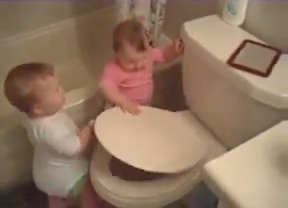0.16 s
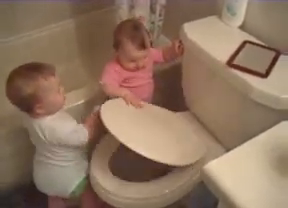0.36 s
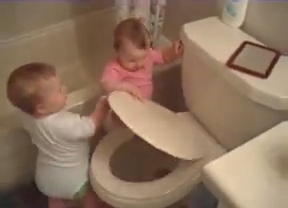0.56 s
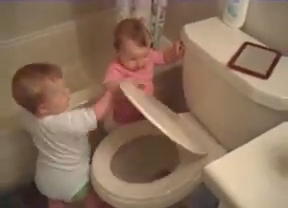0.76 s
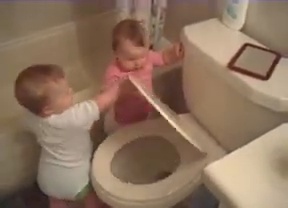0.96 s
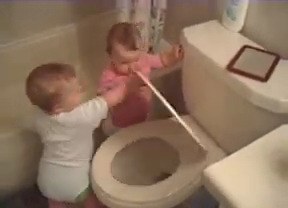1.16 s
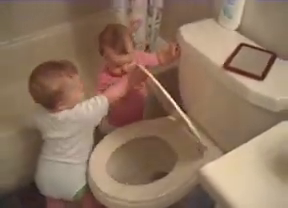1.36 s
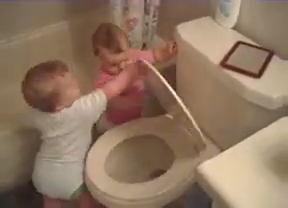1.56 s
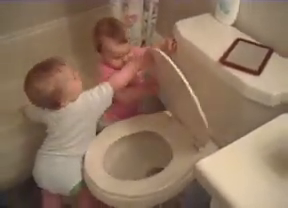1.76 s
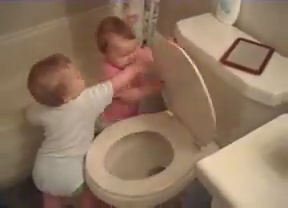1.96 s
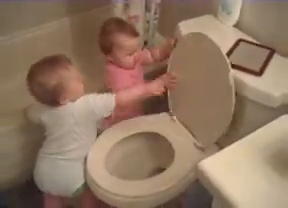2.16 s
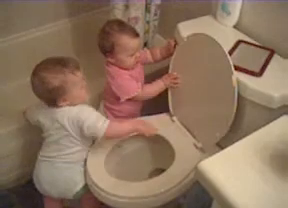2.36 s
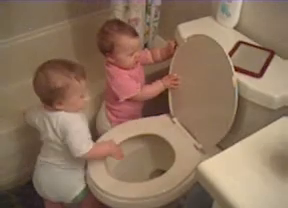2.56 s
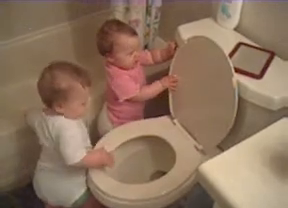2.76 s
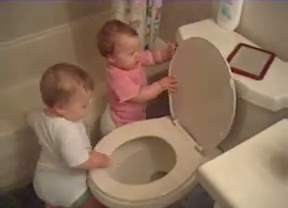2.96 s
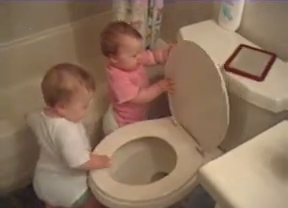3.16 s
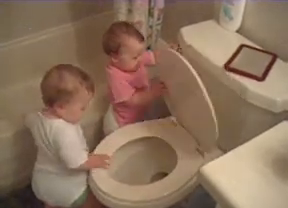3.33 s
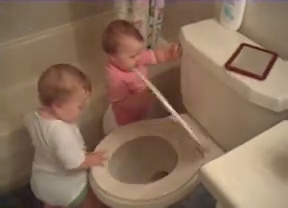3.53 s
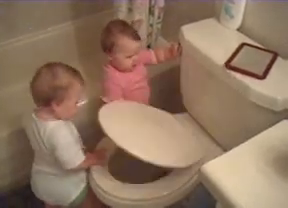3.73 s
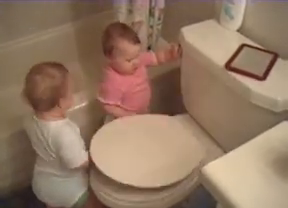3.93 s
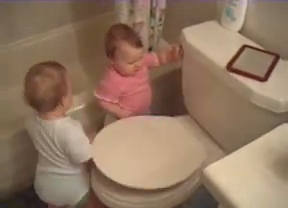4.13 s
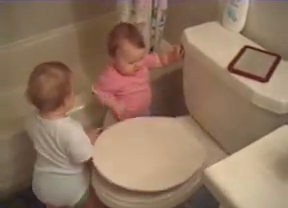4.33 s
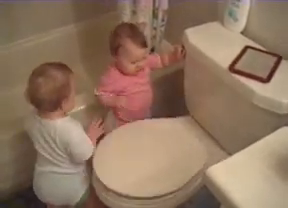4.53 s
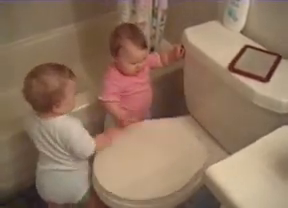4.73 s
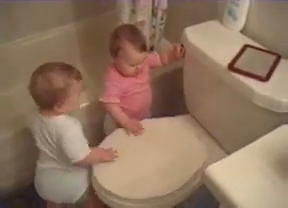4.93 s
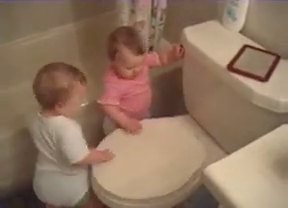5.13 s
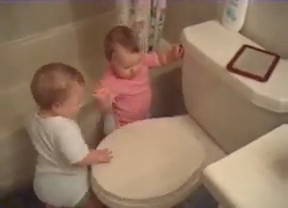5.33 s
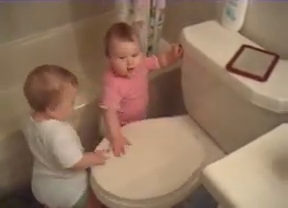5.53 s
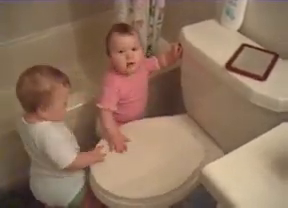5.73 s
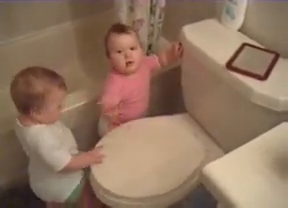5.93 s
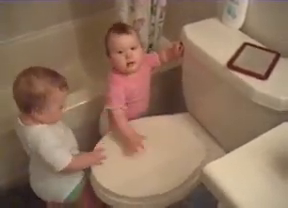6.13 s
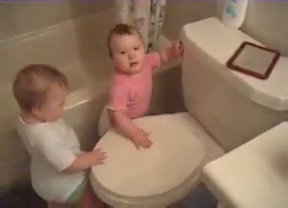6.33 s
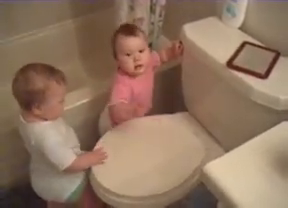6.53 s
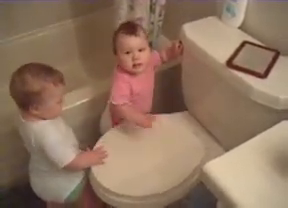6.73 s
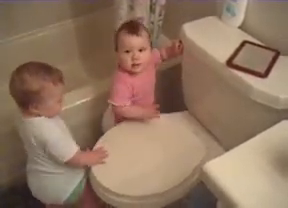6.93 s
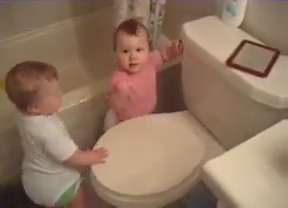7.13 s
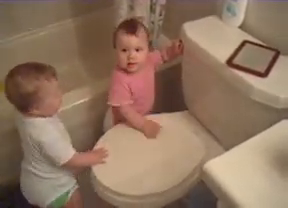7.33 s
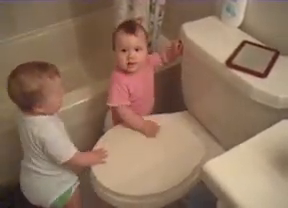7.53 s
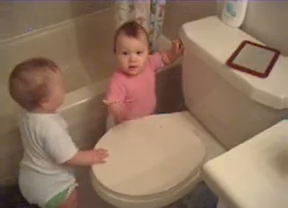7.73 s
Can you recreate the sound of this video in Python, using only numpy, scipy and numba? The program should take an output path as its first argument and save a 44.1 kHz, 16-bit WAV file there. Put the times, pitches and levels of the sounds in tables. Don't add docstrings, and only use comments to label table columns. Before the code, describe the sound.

Irregular hard bangs of a toilet lid, with hollow porcelain ringing and short bright tile echo, captured by a cheap overloaded camcorder microphone with hiss and hum.

```python
import sys
import numpy as np
from scipy import signal
from scipy.io import wavfile
from scipy.ndimage import uniform_filter1d
from numba import njit

SR = 44100
rng = np.random.default_rng(int(sys.argv[2]) if len(sys.argv) > 2 else 0)


def wav_record(signal):
    frames = np.transpose(np.atleast_2d(signal))
    bounded = np.clip(frames, -1, 1)
    quanta = np.round(bounded * 32767).astype(np.int16)
    wavfile.write(sys.argv[1], SR, quanta)


def elevation(decibels):
    levels = np.asarray(decibels, float)
    return 10 ** (levels / 20)


N = 343274
CONTACT_MS = 4.14

# start_s, end_s
STALLS = [
    (1.6387, 1.7405),
    (6.443, 6.5458),
]


def room_time(s):
    return s - sum((end - start) * (s > start) for start, end in STALLS)


def add(out, s, x):
    i = int(s * SR)
    out[i:i + len(x)] += x[:N - i]


def on_log_axis(hz, table):
    table = np.array(table)
    return np.interp(np.log(hz), np.log(table[:, 0]), table[:, 1])


def mode(t, hz, db, t60):
    return elevation(db) * np.sin(2 * np.pi * hz * t) * np.exp(-np.log(1000) * t / t60)


def blow_db(blow, hz):
    _, peak, bass, treble, _ = blow
    overdrive_db = 4
    colour = [(70, bass - 9), (250, bass), (800, bass / 2 - 3), (1500, 0), (4000, treble)]
    return peak + overdrive_db + on_log_axis(hz, colour)


def rings(blows, modes):
    ring_db, crack_db, crack_fall_s = -2.5, -1, 0.0039
    crack_len = 400
    out, t = np.zeros(N), np.arange(SR // 2) / SR
    chance = rng.standard_normal((len(blows), 2 * len(modes) + crack_len))
    contact = 1 - np.exp(-t / (CONTACT_MS * 0.00027))
    crack_shape = contact[:crack_len] * np.exp(-t[:crack_len] / crack_fall_s)
    for blow, luck in zip(blows, chance):
        ring = 0
        for k, (hz, db, t60) in enumerate(modes):
            detuned_hz = hz * (1 + 0.012 * luck[2 * k + 1])
            ring = ring + mode(t, detuned_hz, db + blow_db(blow, hz) + 2.5 * luck[2 * k], t60)
        start = room_time(blow[0])
        add(out, start, elevation(ring_db) * ring * contact)
        add(out, start, elevation(crack_db + blow_db(blow, 5000)) * luck[-crack_len:] * crack_shape)
    return out


# start_s, peak_db, bass_db and treble_db (against the middle), decay_stretch (times)
SEAT = [(3.909, -6.5, -12.5, -6.5, 1), (3.948, -17, -6.5, 2, 1), (3.998, -8, -9, -3.5, 1),
        (4.051, -13, -8, -1.5, 1), (4.09, -11.5, -10, -1.5, 0.8), (4.82, -11.5, -1, -2, .88),
        (5.441, -28, 11, -3.5, 1), (5.472, -18.5, -8.5, -3.5, .78), (6.063, -30.5, 7, -14.5, 0.94),
        (6.66, -16.5, -1.5, -9.5, 0.83), (6.698, -5.5, -7.5, -2.5, 0.72), (6.715, -9, 4, -10.5, 0.32),
        (7.373, -20, 1, -9, 1), (7.402, -20.5, -5, -0.5, 0.66)]
# pitch_hz, level_db, t60_s
SEAT_MODES = [(135, -18.5, 0.27), (396, 3.5, 0.04), (500, -6, 0.094), (737.5, -6.5, 0.15),
              (1200, -6.5, 0.049), (1602, -14, 0.038), (1995, -10.5, 0.088), (2235, -14, 0.066),
              (2800, -10.5, 0.13)]


def lid_on_seat():
    return rings(SEAT, SEAT_MODES)


# start_s, peak_db, bass_db and treble_db (against the middle), decay_stretch (times)
TANK = [
    (1.474, -12, -5.5, -6, 1.5),
    (1.529, -20.5, -6, -2, 0.72),
    (1.544, -19, -2.5, -7.5, 0.73),
    (1.564, -17.5, -6, -6.5, 0.66),
    (3.28, -17, -14.5, -6, 0.81),
]
# pitch_hz, level_db, t60_s
TANK_MODES = [(383, 1, 0.018), (656, -2.5, 0.13), (900, -5, 0.054), (1250, -13.5, 0.13),
              (1500, -10.5, 0.035), (1840, -18.5, 0.1), (2043, -10.5, 0.044)]


def lid_on_tank():
    return rings(TANK, TANK_MODES)


# start_s, level_db, centre_hz, length_ms
CRACKS = [
    (1.4766, -7.5, 2690, 2.5),
    (3.9083, -2, 2570, 0.97),
    (3.9976, -2, 1280, 2.5),
    (4.0014, -5, 2860, 1.5),
    (4.052, -7, 1500, 2.2),
    (4.0898, -3, 1002, 1.4),
    (4.8217, -5.5, 1200, 1.2),
    (6.6974, -6.5, 2140, 2),
]


def edge_cracks():
    out, t = np.zeros(N), np.arange(600) / SR
    noises = rng.standard_normal((len(CRACKS), 600))
    for (s, db, hz, ms), noise in zip(CRACKS, noises):
        burst = signal.lfilter(*signal.iirpeak(hz, 1.2, SR), noise)
        add(out, room_time(s), elevation(db) * burst / burst.std() * np.exp(-(t * 1000 / ms) ** 2))
    return out


def porcelain(knocks, modes):
    out, t = np.zeros(N), np.arange(SR) / SR
    for s, blow, hardness, front in knocks:
        ring = 0
        for hz, t60, swell_ms, db, answer in modes:
            level = blow + db + hardness * np.log2(hz / 400) + front * answer
            ring = ring + mode(t, hz, level, t60) * (1 - np.exp(-t * 1000 / swell_ms))
        add(out, room_time(s), ring)
    return out


# start_s, level_db, hardness_db_per_octave, front_db (how far to the front)
BOWL = [(3.91, -16.5, 0, 0.5), (4.0, -24.5, 7.5, -6.5), (4.09, -24.5, 8, -5.0), (4.821, -15.0, 1.0, -0.5),
        (5.443, -27, -11, -7.5), (5.474, -23.5, -5.5, -8.5), (6.066, -29.5, 1.5, -4.5), (6.662, -20, 1, 3),
        (6.7, -26, 10, 0), (7.375, -26.0, -6.5, 11), (7.404, -35, 14, 0.5)]
# pitch_hz, t60_s, swell_ms, level_db, front_answer (about -1 to 1)
BOWL_MODES = [(202.4, 0.28, 9, -1, 0.64), (238.7, .23, 8.6, 2, -0.67), (345, 0.3, 2.5, -2.5, 0.23),
              (693, 0.23, 8.1, -1, 0.99), (1098, .21, 41, -2.5, -1.1), (191, 1.94, 300, -25.5, 0.34)]


def bowl_ring():
    return porcelain(BOWL, BOWL_MODES)


# start_s, level_db, hardness_db_per_octave, front_db (how far to the front)
TANK_RING = [
    (1.476, -41, 4.0, -4),
    (1.53, -25.5, 2, 7.5),
    (1.56, -32, 4.5, 10.5),
    (3.232, -54.5, -5, -7),
    (3.285, -35, -4.5, -2.5),
]
# pitch_hz, t60_s, swell_ms, level_db, front_answer (about -1 to 1)
TANK_LONG = [(271.0, 0.35, 6.5, -7.5, -1.6), (306.3, 0.22, 5.0, 5.5, -0.15), (527, 0.3, 10, -3, 0.81),
             (755.3, 0.32, 4.0, 2.0, 0.016), (1260.0, 0.26, 4.8, -2.5, -0.1)]


def tank_ring():
    return porcelain(TANK_RING, TANK_LONG)


def band_noise(hz):
    edges = [hz / 2 ** (1 / 6), hz * 2 ** (1 / 6)]
    band = signal.butter(2, edges, "bandpass", fs=SR, output="sos")
    x = signal.sosfilt(band, rng.standard_normal(N))
    return x / x.std()


# pitch_hz, t60_s
TAIL_T60 = [(100, 0.47), (300, 0.31), (1000, .27), (3000, 0.28), (6500, 0.26)]
# pitch_hz, level_db
TAIL_COLOUR = [(60, -17.5), (150, -7.5), (400, -5), (700, -2), (950, -2.5), (1350, -5.5), (2000, -3.5),
               (3200, 3), (5000, 0.5), (7000, 0)]


def tails(blows, level_db, shape):
    tail_db = -10
    out, t = np.zeros(N), np.arange(int(0.7 * SR)) / SR
    for hz in 63 * 2 ** (np.arange(22) / 3):
        power = np.zeros(N)
        for blow in blows:
            ms, stretch = shape(blow)
            rise = 1 - np.exp(-t / (max(ms, 0.3) / 1000 + 0.5 / hz))
            t60 = max(stretch, 0.2) * on_log_axis(hz, TAIL_T60)
            fall = np.exp(-2 * np.log(1000) * t / t60)
            add(power, room_time(blow[0]), elevation(2 * level_db(blow, hz)) * rise ** 2 * fall)
        out += elevation(tail_db + on_log_axis(hz, TAIL_COLOUR)) * np.sqrt(power) * band_noise(hz)
    return out


def blow_shape(blow):
    return CONTACT_MS, blow[4]


def touch_db(touch, hz):
    _, peak, centre_hz, fall, _ = touch
    return peak - fall * abs(np.log2(hz / centre_hz))


def touch_shape(touch):
    contact_ms = touch[4]
    return contact_ms, 0.41 + 0.13 * np.log2(max(contact_ms, 0.3))


# start_s, peak_db,
# centre_hz, fall_db_per_octave, contact_ms
TOUCH = [(.121, -36, 2500, 4, 0.96), (.13, -34, 500, 5.5, 6.5), (.945, -28, 3300, 5, 2.8),
         (2.555, -30.5, 900, 8.5, 38), (3.671, -36, 2270, 27, 3.4), (4.542, -42, 1500, 17, 3),
         (4.689, -37.5, 2600, 7.5, 1), (5.84, -30.5, 1900, 13, 52), (6.063, -28.5, 2200, 5.5, 3.1),
         (6.15, -36, 3000, 3.5, 5.4), (6.346, -33.5, 5200, 5.5, 2.2), (7.046, -30, 2200, 29.5, 1.4),
         (7.188, -40, 3000, 10, 6.8), (1.4705, -33, 500, 2, 3.6), (3.9045, -29, 500, 3.5, 3.7),
         (4.816, -34, 1500, 2.5, 3.3)]


def light_touches():
    return tails(TOUCH, touch_db, touch_shape)


# pitch_hz, level_db_per_hz
HISS = [(15, -50), (25, -24.5), (48, -9.5), (85, -12), (103, -14), (121, -4), (147, -10.5), (229, -11.5),
        (270, -5), (444, -12), (678, -12.5), (781, -13.5), (989, -15.5), (2730, -15), (7000, -18.5),
        (9100, -54), (15400, -120)]


def tape_hiss():
    hiss_db, waver_db = -51, 0.87
    dip_hz, dip_width_hz, dip_share = 5500, 800, 0.45
    hiss = 0
    for hz in 25 * 2 ** (np.arange(26) / 3):
        steps = np.repeat(rng.standard_normal(80), N // 80 + 1)[:N]
        waver = uniform_filter1d(steps, size=4000)
        hiss = hiss + elevation(on_log_axis(hz, HISS) + waver_db * waver) * np.sqrt(hz) * band_noise(hz)
    hiss = hiss - dip_share * signal.lfilter(*signal.iirpeak(dip_hz, dip_hz / dip_width_hz, SR), hiss)
    return hiss * elevation(hiss_db) / hiss.std()


def narrow_noise(hz, width_hz):
    x = signal.lfilter(*signal.iirpeak(hz, hz / width_hz, SR), rng.standard_normal(N))
    return x / x.std()


# pitch_hz, level_db
HUM = [(240, -66.5)]


def mains_and_drive():
    mains_db, mains_fade_db_s = -63, -0.42
    whine_hz, whine_pulse_hz, whine_db = 2780, 18, -61
    t = np.arange(N) / SR
    hum = sum(elevation(db) * np.sqrt(2) * np.sin(2 * np.pi * hz * t) for hz, db in HUM)
    hum += elevation(mains_db + mains_fade_db_s * t) * np.sqrt(2) * np.sin(2 * np.pi * 120 * t)
    turn = np.sin(np.pi * whine_pulse_hz * t) ** 4
    whine = np.sin(2 * np.pi * whine_hz * t) + 0.7 * narrow_noise(whine_hz, 60)
    return hum + elevation(whine_db) * turn * whine


def scene():
    lid = lid_on_seat() + lid_on_tank() + edge_cracks()
    fixtures = bowl_ring() + tank_ring()
    room = tails([*SEAT, *TANK], blow_db, blow_shape) + light_touches()
    background = tape_hiss() + mains_and_drive()
    return (lid + fixtures + room + background)[None]


@njit
def squeeze(x, top, power, attack, release):
    y, level = np.empty(len(x)), 0.
    for i in range(len(x)):
        a = abs(x[i])
        level += (a - level) * (attack if a > level else release)
        y[i] = x[i] * min(1., (top / (level + 1e-9)) ** power)
    return y


# start_s, length_ms, offset (share of full scale)
JUMPS = [(1.4746, 2.25, 0.59), (1.4763, 1.07, -0.59), (1.4773, 1.1, 0.58), (1.4789, 1.1, -0.45),
         (1.4814, 23, -.23), (3.9077, 3.5, -0.37), (3.9113, 25, .41), (3.949, 40, -0.37),
         (3.9988, 1.6, 0.71), (4.0036, 7.3, -0.6), (4.011, 22, 0.44), (4.051, 32, .35), (4.0892, 36, 0.41),
         (4.8257, 1.67, -0.52), (4.829, 19, -0.19), (6.698, 2.64, 0.51), (6.709, 7.3, 0.4),
         (6.716, 2.6, -.5), (6.722, 24, 0.36)]


def off_centre_jumps():
    sag_s = 0.091
    t, offset = np.arange(N) / SR, np.zeros(N)
    for s, ms, size in JUMPS:
        add(offset, room_time(s), size * np.exp(-t[:int(ms * SR / 1000)] / sag_s))
    return uniform_filter1d(offset, size=14)


def stall(x):
    t = np.arange(N) / SR
    for start, end in STALLS:
        x = x * np.clip(abs(t - start) / 0.0004, 0, 1)
        x = np.insert(x, int(start * SR), np.zeros(int((end - start) * SR)))[:N]
    return x


def top_cut(x):
    return signal.sosfilt(signal.butter(12, 16970, fs=SR, output="sos"), x)


def record(dry):
    top_db, ratio, attack_s, release_s = -14.5, 1.68, 0.0022, 0.042
    clip, tape_top_hz = 0.76, 6832
    x = squeeze(dry[0], float(elevation(top_db)), 1 - 1 / ratio, 1 / (attack_s * SR), 1 / (release_s * SR))
    x = x + off_centre_jumps()
    x = signal.sosfilt(signal.ellip(10, 0.3, 75, tape_top_hz, fs=SR, output="sos"), x)
    x = np.clip(x, -clip, clip)
    x = signal.sosfilt(signal.ellip(6, 0.5, 40, 15800, fs=SR, output="sos"), x)
    mix = stall(x)[None]
    return top_cut(mix)


dry = scene()
out = record(dry)
wav_record(out)
```